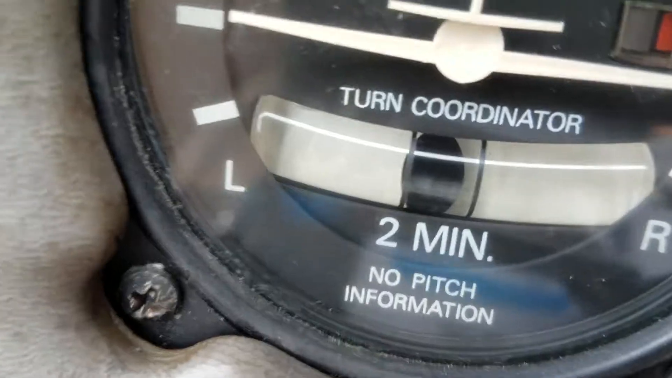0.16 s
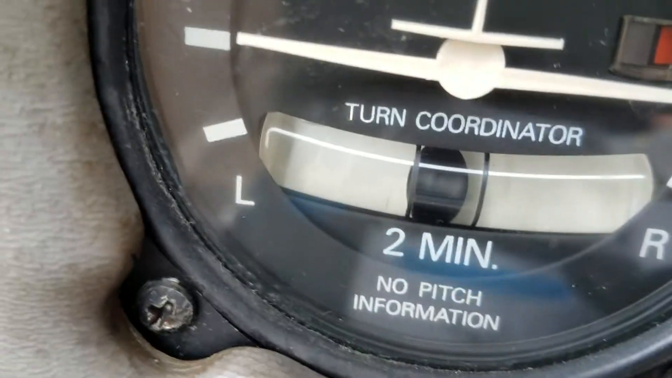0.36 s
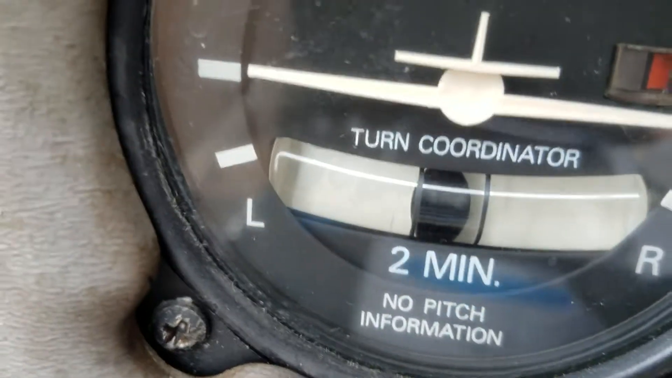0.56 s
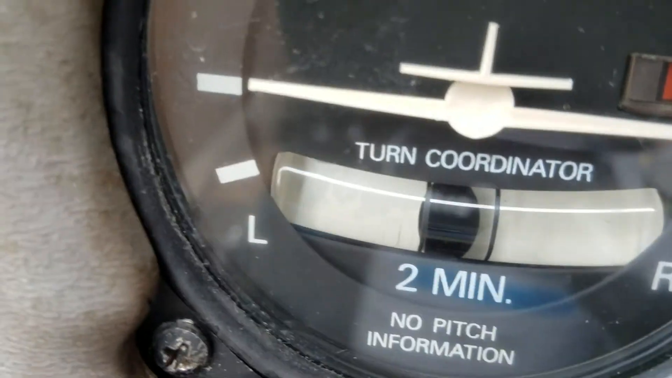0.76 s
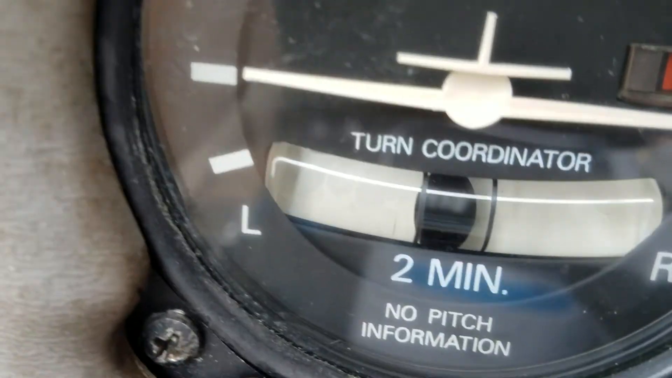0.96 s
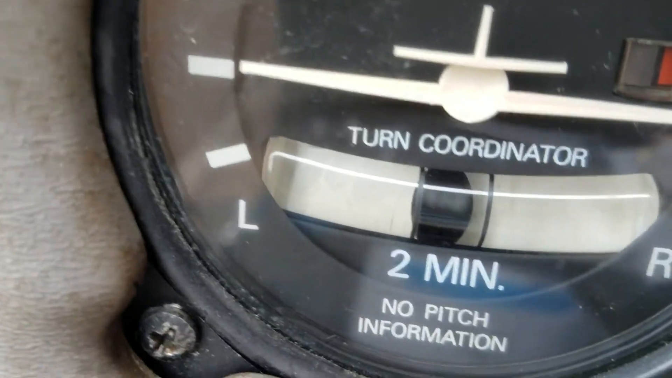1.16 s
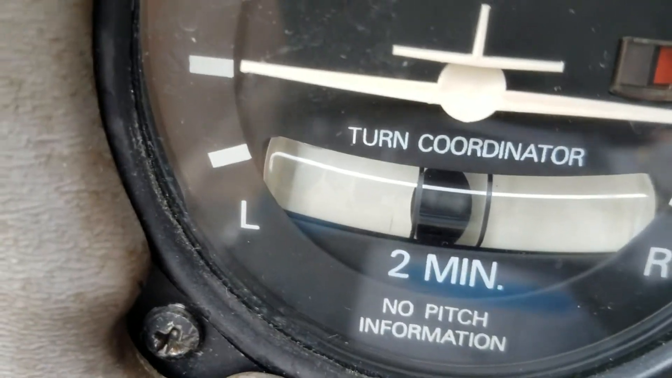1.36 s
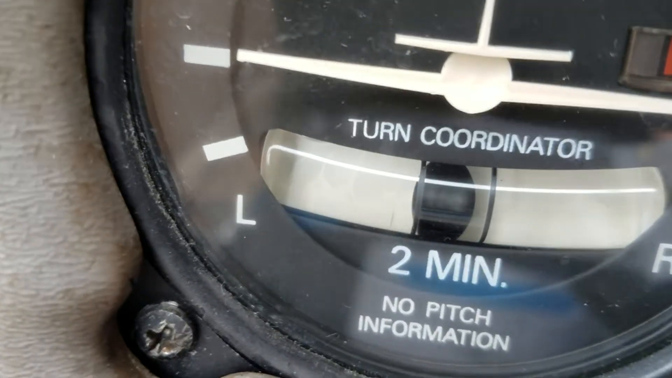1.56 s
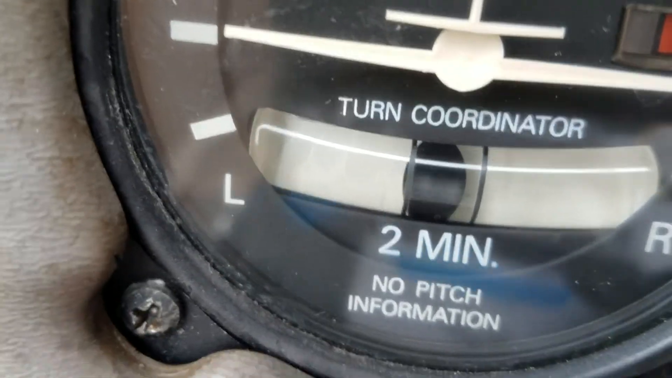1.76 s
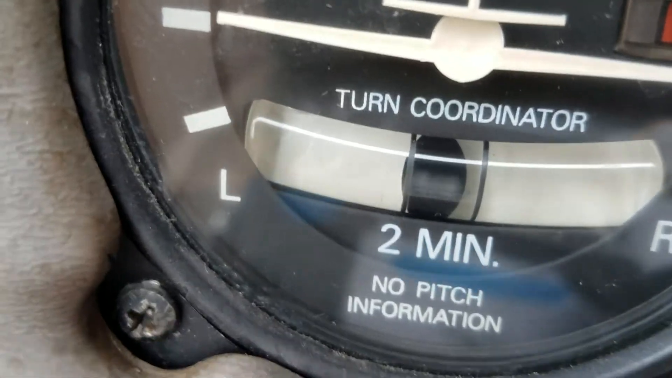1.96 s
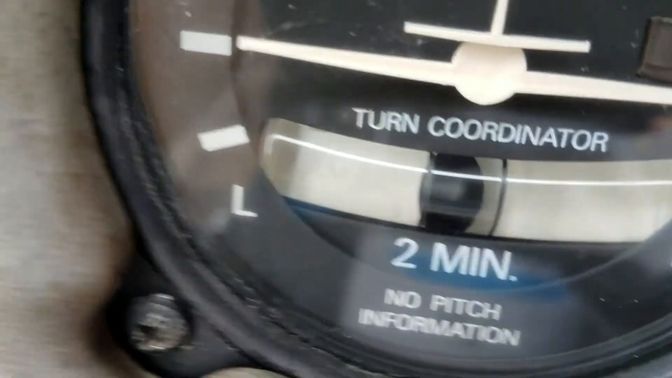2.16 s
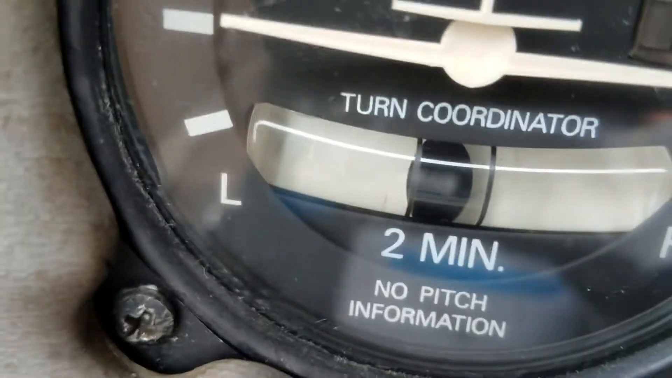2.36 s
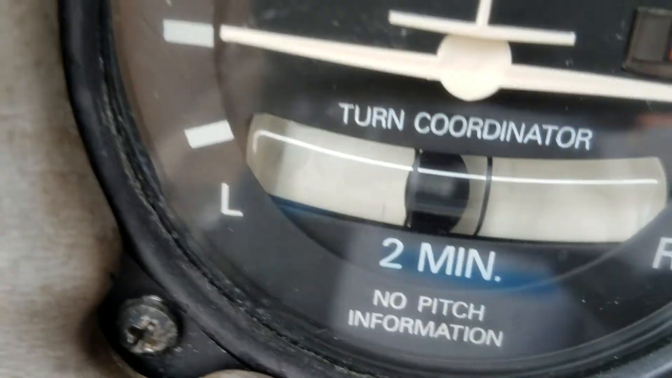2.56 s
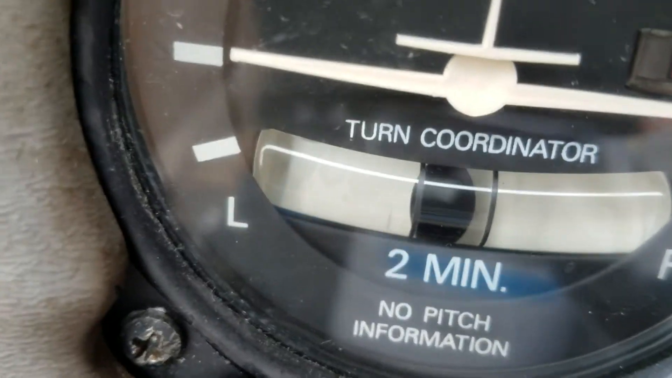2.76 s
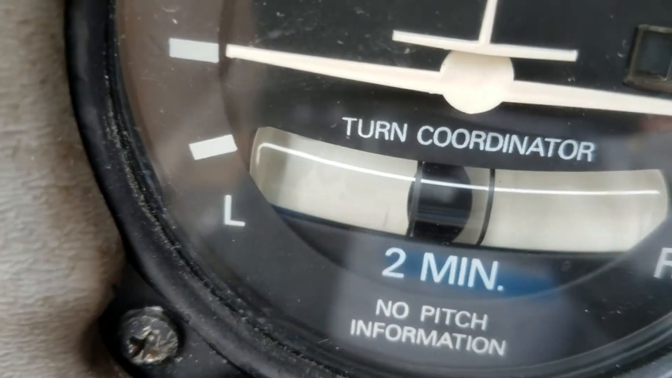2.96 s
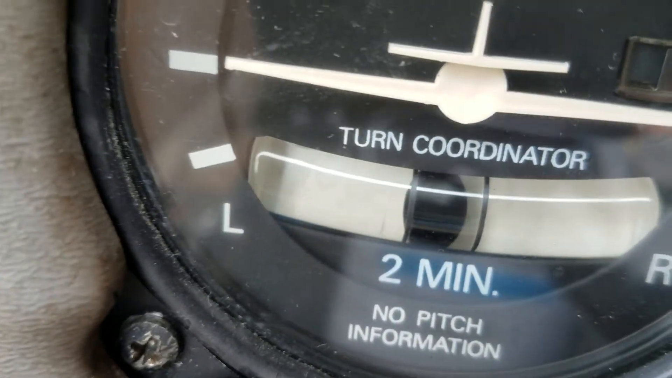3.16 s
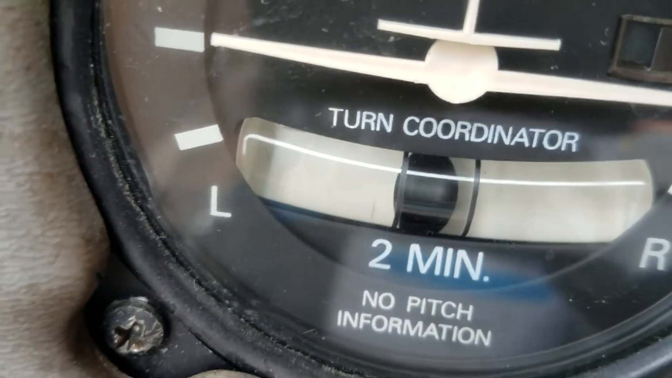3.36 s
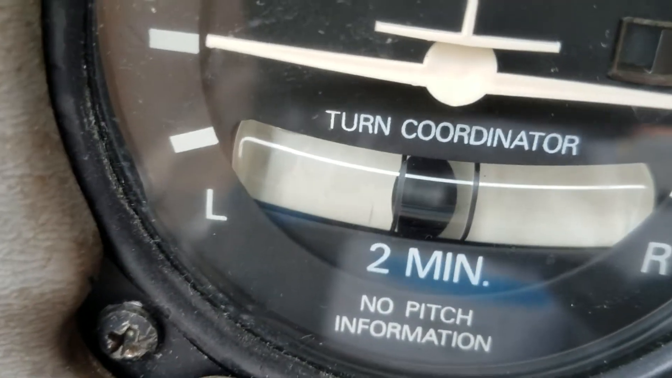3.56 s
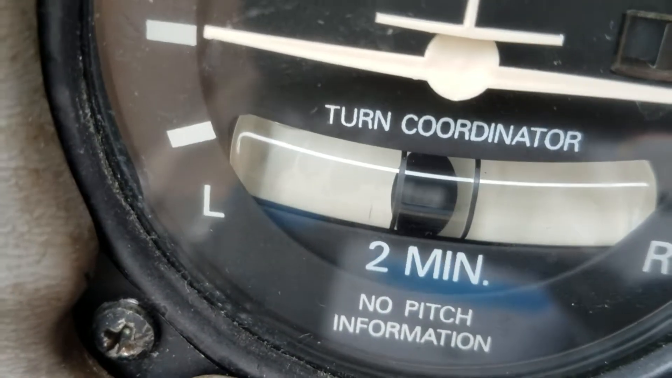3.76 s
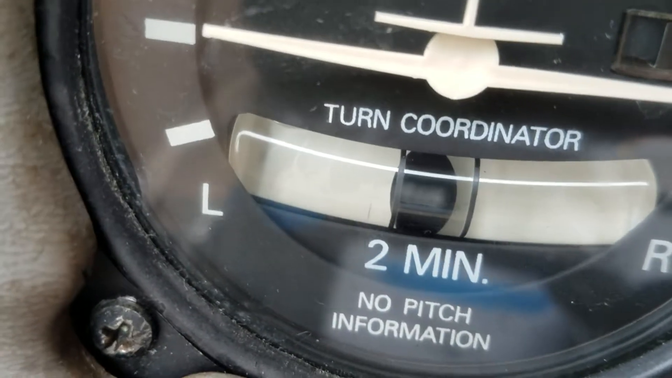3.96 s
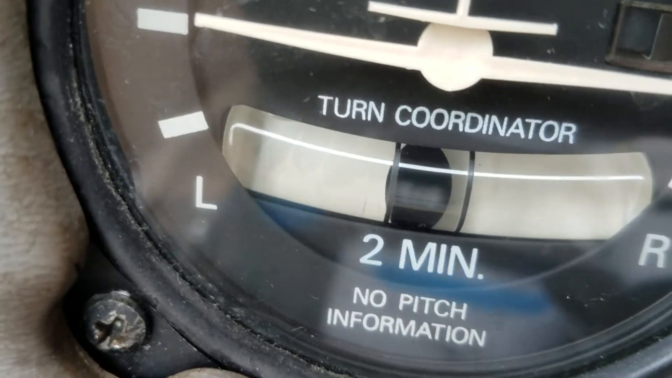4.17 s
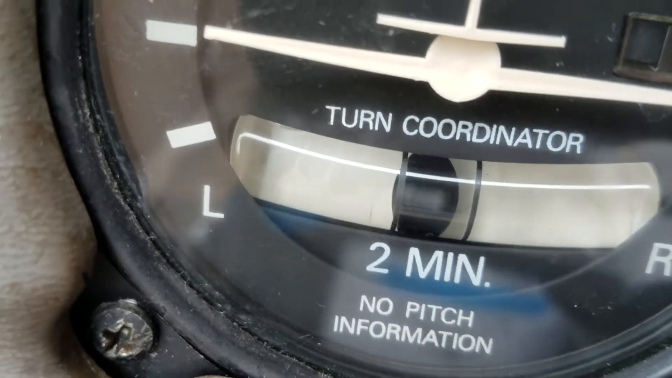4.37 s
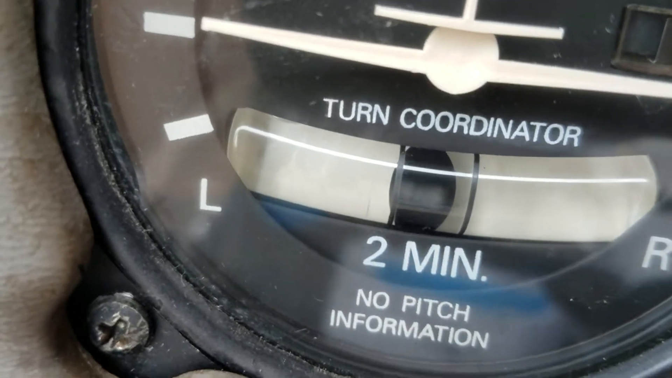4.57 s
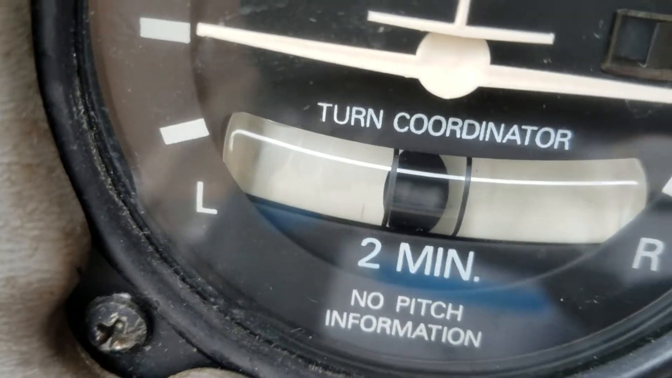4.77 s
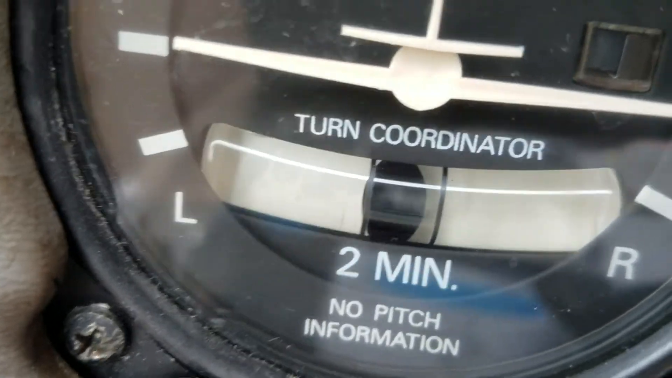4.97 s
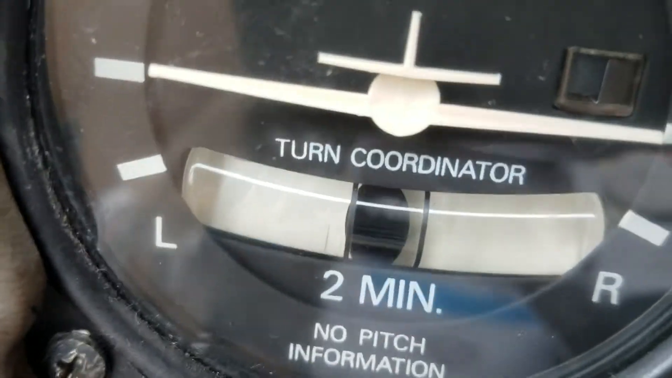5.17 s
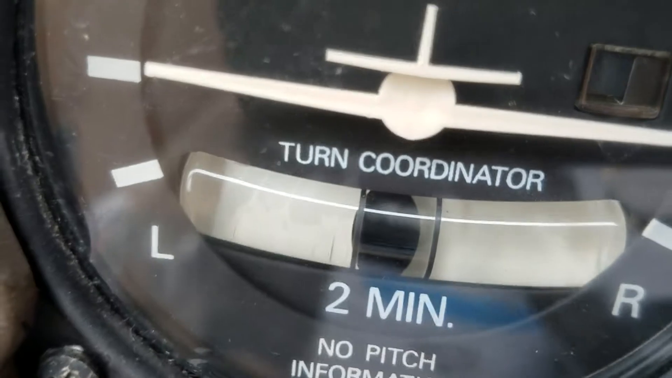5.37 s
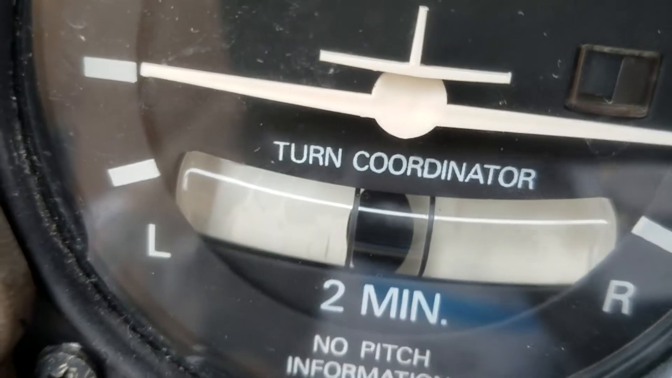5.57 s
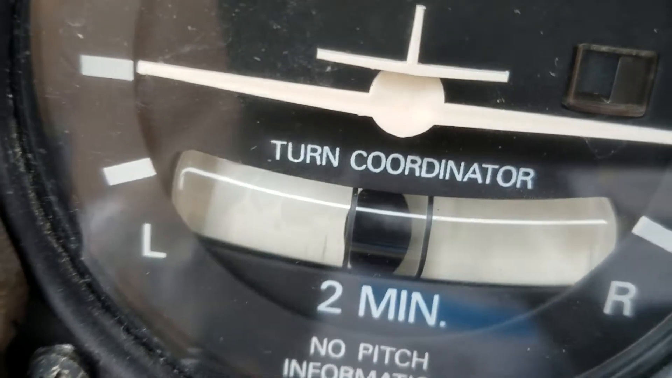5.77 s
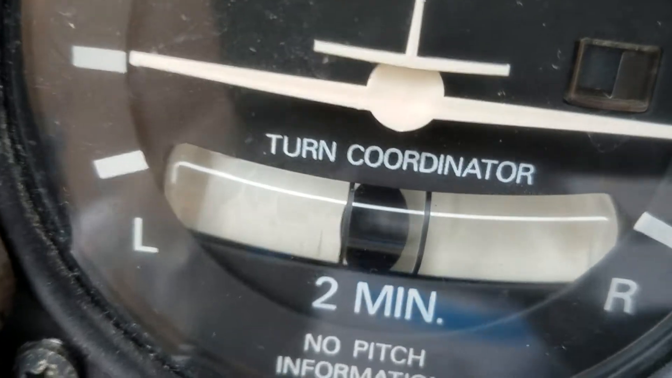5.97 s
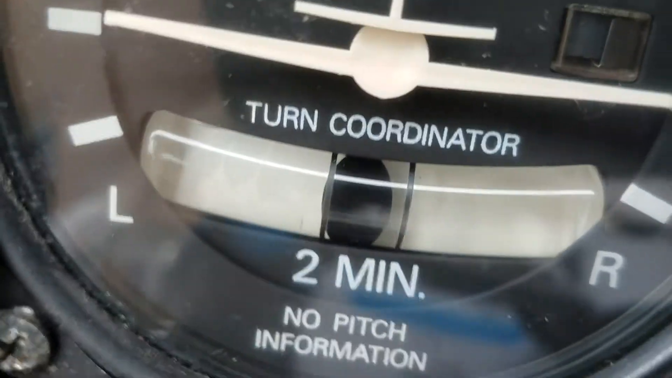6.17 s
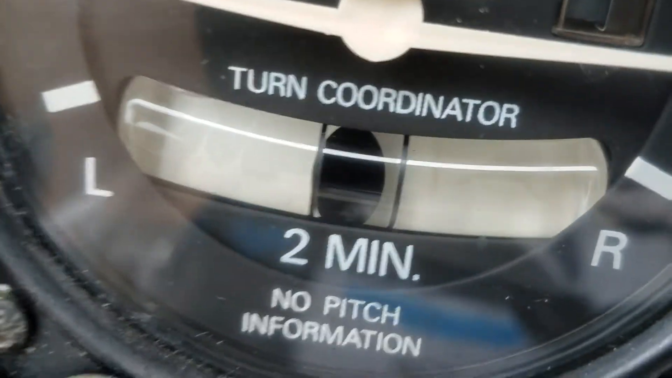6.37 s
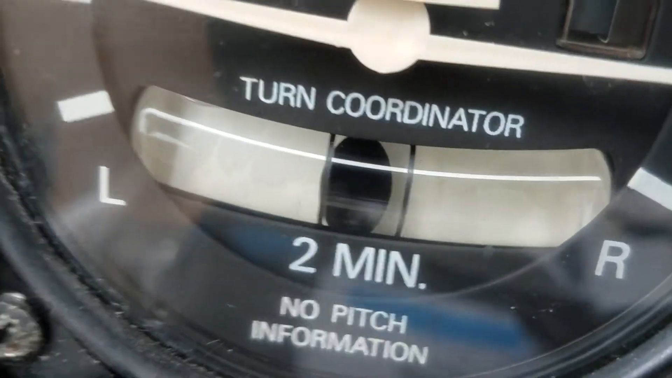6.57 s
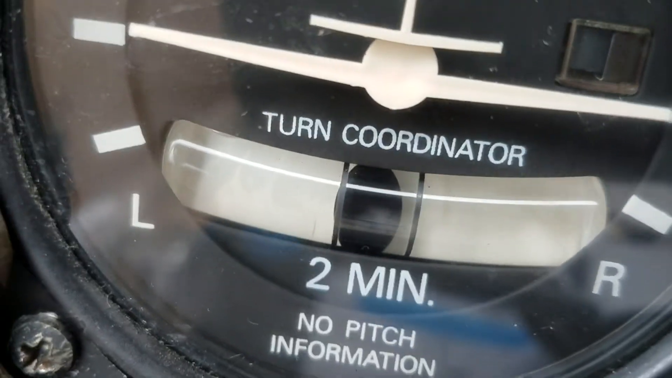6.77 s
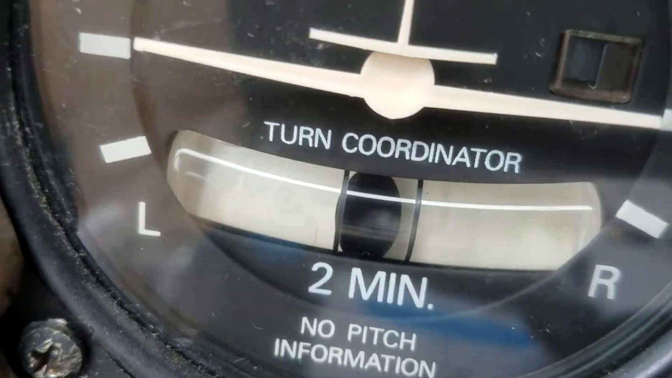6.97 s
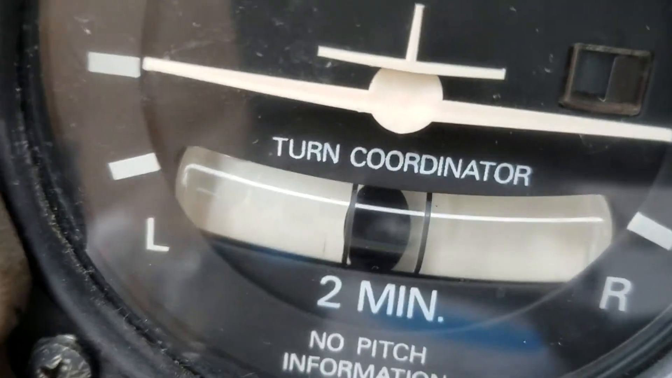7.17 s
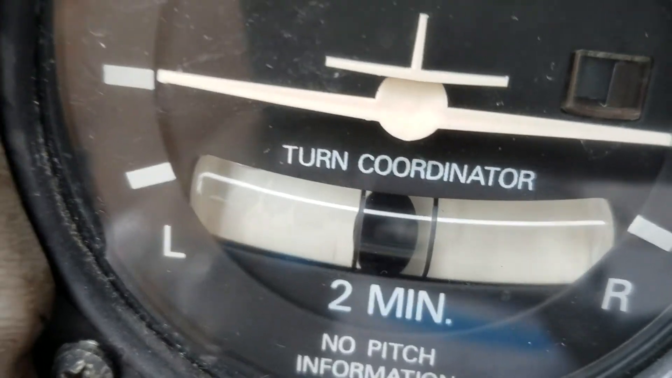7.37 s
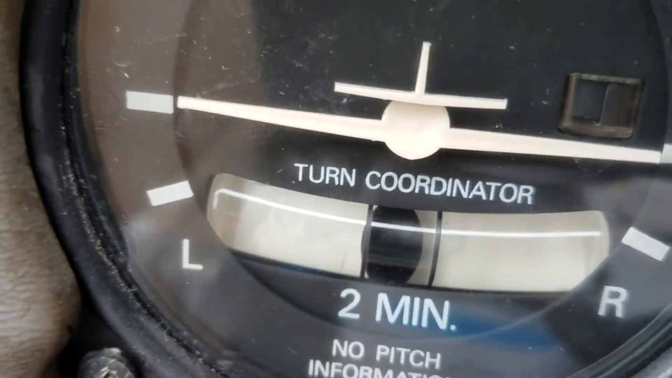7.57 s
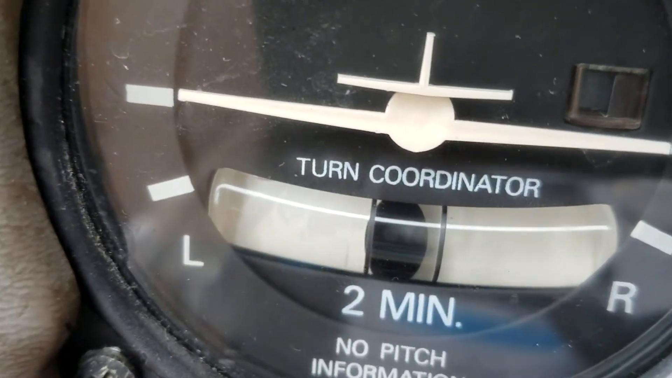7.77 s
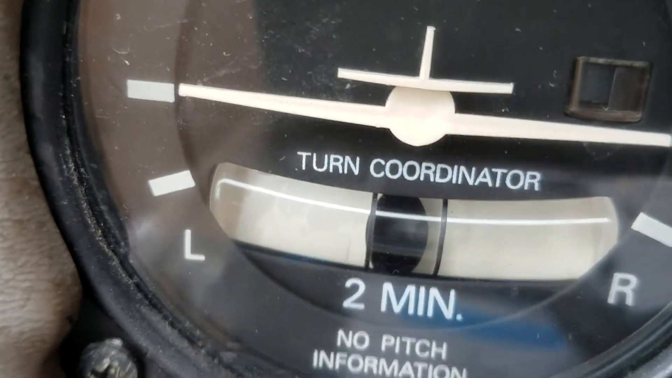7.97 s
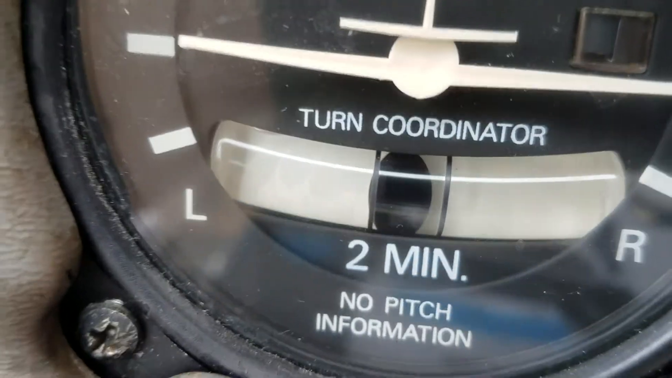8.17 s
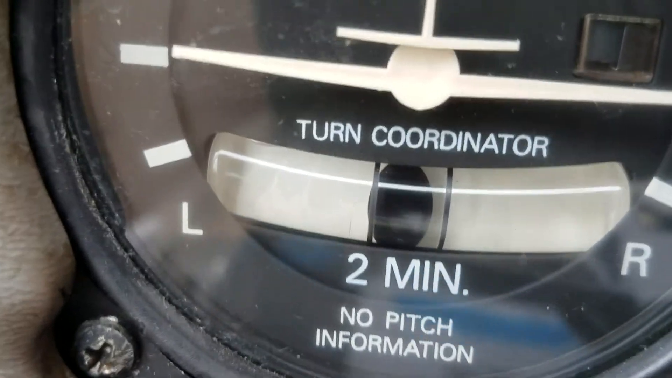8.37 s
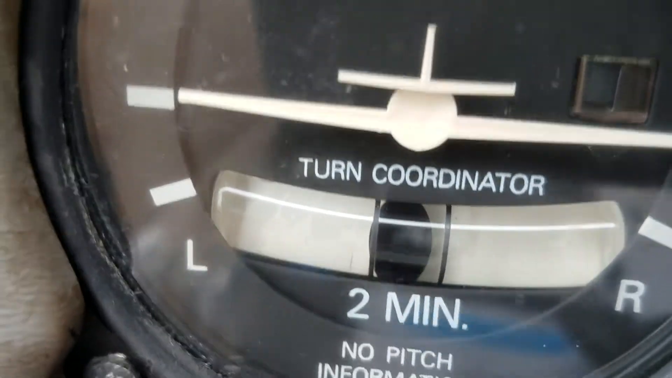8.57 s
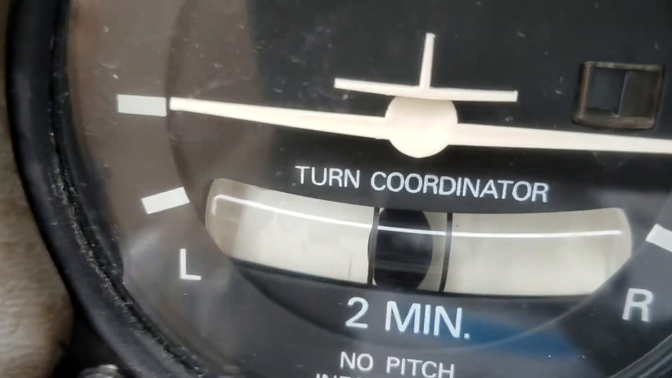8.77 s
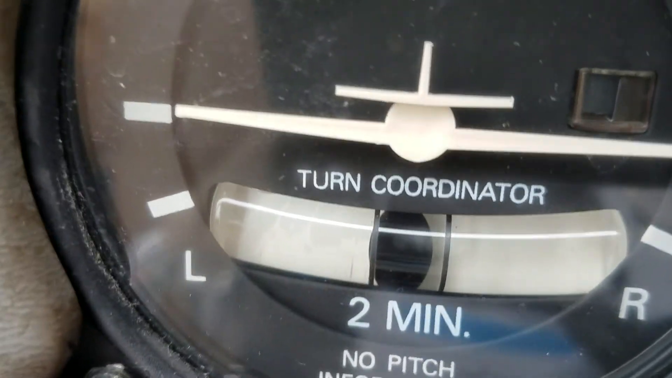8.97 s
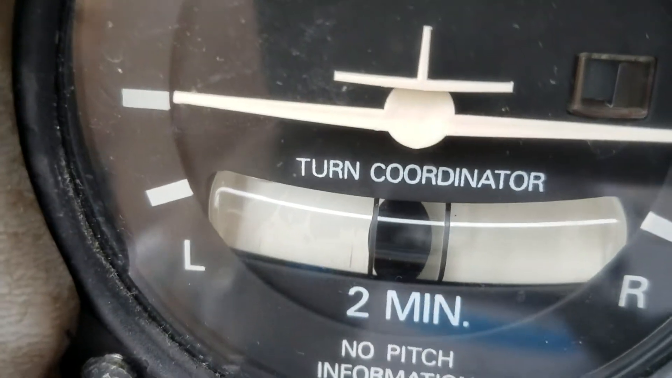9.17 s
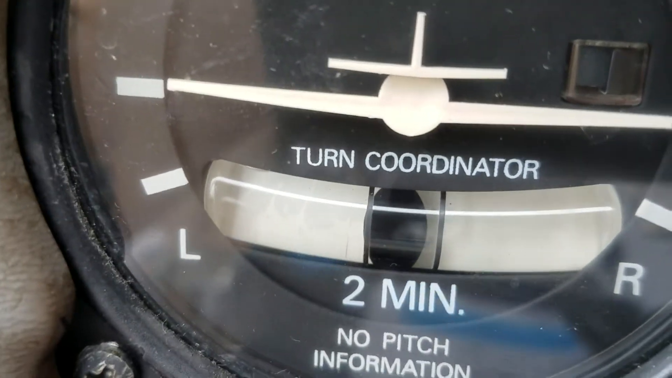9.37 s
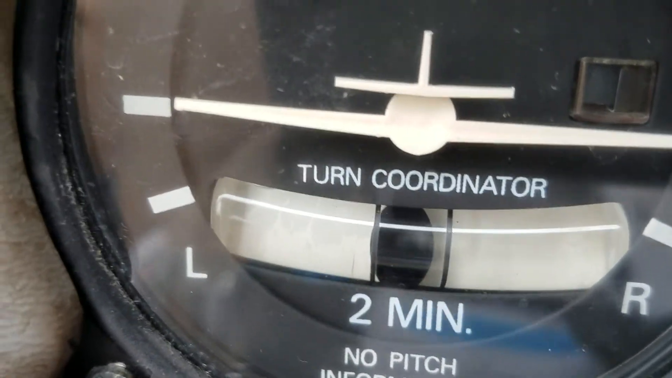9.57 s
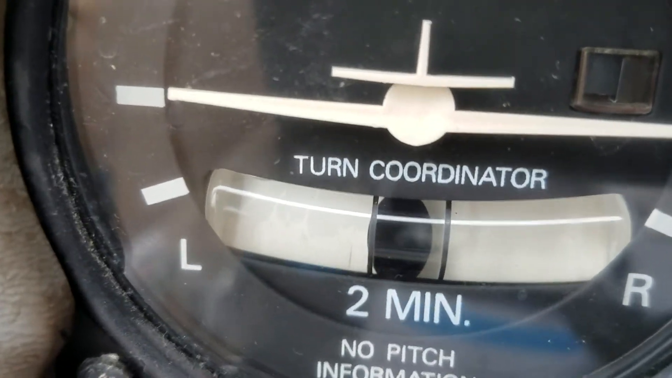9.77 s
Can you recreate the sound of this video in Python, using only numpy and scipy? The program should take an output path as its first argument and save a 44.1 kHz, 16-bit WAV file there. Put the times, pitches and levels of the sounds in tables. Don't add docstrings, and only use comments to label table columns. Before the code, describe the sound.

Very close in a quiet room, fingers thump the microphone ports of a hand-held device, with a short buzz and small scrapes. A hard double-click switch snaps, light knocks and a cloth brush follow, and a small gyro starts, its hissing bearings swelling into a cluster of metallic tones that climb quickly, then ever more slowly.

```python
import sys
import numpy as np
from scipy import signal
from scipy.fft import rfft, irfft, next_fast_len
from scipy.io import wavfile
from scipy.ndimage import map_coordinates

SR = 44100
rng = np.random.default_rng(int(sys.argv[2]) if len(sys.argv) > 2 else 0)


def waveform_to_disk(signal):
    frames = np.transpose(np.atleast_2d(signal))
    scaled = np.clip(frames, -1, 1) * 32767
    samples = np.round(scaled).astype(np.int16)
    wavfile.write(sys.argv[1], SR, samples)


def gain_from_db(level_db):
    decades = np.asarray(level_db, float) / 20
    return 10 ** decades


N = 433944
T = np.arange(N) / SR

START = 1.35
OUTER, INNER, SPIN = 3.305, 3.321, 2.678

# frequency in Hz, level in dB.
ROOM_AIR = [(180, -46), (300, -2.5), (737, -5.5), (900, -5.5), (3130, -13), (4990, -19), (8220, -11),
            (10400, -25), (12900, -17), (16000, -12.5)]
# frequency in Hz, level in dB.
RUMBLE_COLOUR = [(15, -14), (35, -4), (70, 4.5), (130, -1.5), (250, -7), (450, -23), (900, -31)]
# time in seconds, level in dB.
GRIP = [(0, -84), (.3, -64), (.6, -62), (.66, -83), (.85, -65), (.93, -75), (1.33, -72), (1.39, -56),
        (1.55, -73), (2.03, -69), (2.2, -72), (3.0, -78)]
# time in seconds, level in dB.
HAND_BUZZ = [
    (.69, -100),
    (.71, -64),
    (.86, -62.5),
    (.94, -110),
]
# start in seconds, peak in dB, left-right in dB, decay in 1/s, swing in Hz.
PORT_POPS = [
    (.011, -46, -5, 600, 100),
    (.0610, -5, 65, 600, 110),
    (0.198, -24.5, -33, 630, 90),
    (0.278, -44, 14, 460, 100),
    (0.6832, 1, -65, 770, 75),
    (0.783, -42, -19, 160, 79),
]
# start in seconds, peak in dB, ring in Hz, click in dB, left-right in dB.
HAND_KNOCKS = [(1.1833, -15.5, 800, 6, -13.5), (1.186, -26, 480, -30, -13), (1.385, -36, 200, -30, 0),
               (1.4155, -39, 700, -20, 0), (1.6364, -24.5, 786, -2.5, -13), (1.7815, -28, 900, 3, 8),
               (2.008, -25.5, 450, -5, -12), (2.046, -34, 300, -20, -2), (2.4059, -23, 665, 6, -8),
               (4.796, -25.5, 300, -30, -12), (4.8, -31, 130, -30, -5), (6.302, -34, 200, -30, 0),
               (6.7, -35, 160, -30, 0), (7.877, -21, 375, -30, -14)]
# start in seconds, peak in dB, decay by 60 dB in seconds,
# low part in dB, left-right in dB.
SWITCH_HITS = [(.799, -56, 0.018, -5, -10), (0.8745, -52, 0.016, -7, -15), (.882, -58, 0.018, -3, -9),
               (1.059, -60.5, 0.093, 2, -11), (1.124, -56, 0.055, 5, -10), (1.2314, -39, 0.07, -10, -25),
               (1.239, -33.5, 0.032, -12.5, 4), (1.3477, -4.5, 0.026, -9.5, -31.5),
               (1.351, -4.5, 0.024, -9.5, 11.5), (1.3633, -21, 0.021, -18, -4),
               (1.725, -51, 0.057, -11, -11), (1.784, -41.5, 0.028, 4.5, -17)]
# frequency in Hz, width in Hz, level in dB.
SWITCH_SPRING = [(8550, 680, 2), (9320, 250, 6.5), (10700, 1800, -12), (13300, 1100, -9.5),
                 (15600, 1100, -7)]
# frequency in Hz, width in Hz, level in dB.
SWITCH_HOUSING = [(200, 150, -21.5), (450, 330, -13), (970, 530, -5.5), (1850, 850, -4.5), (3160, 850, -5),
                  (5500, 3100, -19.5)]
# frequency in Hz, decay by 60 dB in seconds.
ROOM_DECAY = [(200, 1), (1000, 0.2), (4000, 0.22), (12000, 0.21)]
# delay in seconds, left gain, right gain (linear).
NEAR_ECHOES = [(.0029, 0.24, -0.15), (.0047, -0.4, 0.13)]
# time in seconds, shaft speed in dB, twice shaft speed in dB.
ROTOR_HUM = [(2.5, -53, -71), (4, -76, -61), (5.5, -60.5, -56.5), (7, -56.5, -63.5), (8, -52.5, -65),
             (9, -48, -59), (9.84, -40.5, -53)]
# frequency in Hz, width in Hz, level in dB,
# left-right in dB, left lead in radians.
CASE = [(270, 380, -34.5, 12, -0.3), (503.6, 18, -27.5, 20.5, -1), (662, 120, -26.5, 23.5, 3.5),
        (648.4, 86, -14.5, 6, 0.17), (775.3, 18, -17, -20.5, 3.5), (902, 150, -18, -4.5, 1.17),
        (1336, 102, -9.5, -11, 0.48), (1563, 130, -18.5, -3, 2), (1940, 550, -21, -18, 5),
        (2218, 188, -3.5, 1.5, -1.76), (2870, 420, -11.5, -4.5, 1.4), (3740, 970, -23, 6, 2),
        (3940, 1660, -19.5, 1.5, -4), (4269, 268, -6.5, -5, 1.46), (4954, 220, -24, 18.5, 4),
          (4730, 580, -27, 13.5, 4), (5420, 290, -28, 21, -0.5), (5940, 220, -18, -4.5, 0.9),
          (6030, 820, -40, -13, 1.5),
        (7620, 950, -16.5, 1, -3.3), (8122, 540, -6, -13.5, -4), (8314, 270, -7, -15.5, 2.7),
         (8310, 1120, -8.5, -6.5, 3), (10400, 380, -41, 2, 6.5), (9915, 650, -8, -2, -2),
         (9740, 590, -15.5, -0.5, 6), (12270, 400, -18.5, -0.5, -5.5), (13700, 920, -25.5, 5.5, -2),
         (13700, 330, -31, 2, -6.5),
        (3475, 61, -15, -1, 1.6)]
# slow level in dB, fast level in dB,
# sideband below in dB, sideband above in dB.
OUTER_DB = [(-48, -29.5, 12.5, -5), (-29.5, -21, 0, 0), (-29.5, -14.5, -8, -16), (-27.5, -19.5, -4.5, -7),
            (-25, -16.5, -6, -1.5), (-25, -23, 5.5, -5), (-35, -30, 6.5, -11), (-28, -29, 6, -4),
            (-32, -29.5, 8, -19)]
# slow level in dB, fast level in dB,
# sideband below in dB, sideband above in dB.
INNER_DB = [(-25, -15.5, -7, -4), (-22.5, -31, -3, 2.5), (-30, -15.5, -22, -25), (-26.5, -25, -8, -49),
            (-22.5, -23, -4, 2), (-26.5, -34.5, -25, 10), (-30, -37, -5, 8)]
# slow level in dB, fast level in dB,
# sideband below in dB, sideband above in dB.
SPIN_DB = [(-25, -28, -7, -18), (-31, -26, -0.5, -17), (-31.5, -16.5, -18, -6), (-27, -18, -22.5, -14),
           (-28.5, -26, -24, -27), (-45, -23, -25, -19), (-19.5, -19.5, -18, -9), (-26.5, -16.5, -0.5, -9)]
# slow level in dB, fast level in dB.
HALVES_DB = [(-31, -12.5), (-27, -16), (-17.5, -11.5), (-25, -23), (-23, -22)]
FAR_SIDES = [INNER + 1, OUTER + 1.5, INNER + 2, 2 * INNER - 1, 2 * OUTER + 1, 2 * INNER + 1.5, 2 * OUTER +
             2, 3 * OUTER - 1, 2 * INNER + 2.5, 3 * OUTER + 1, 3 * OUTER + 3.5, INNER - 1, 7 * INNER + 1.05]
# slow level in dB, fast level in dB.
FAR_DB = [(-28, -22), (-36, -26), (-25.5, -26.5), (-37, -28), (-29.5, -14.5), (-26, -21), (-31, -19.5),
          (-45, -24), (-38, -22.5), (-30, -29), (-25, -18), (-29, -22), (-24, -25)]
# time in seconds, left-right in dB.
PHONE_DRIFT = [(1.46, -6), (1.8, 1), (2.4, 3), (3.2, 3), (4.1, -1), (4.9, -1), (5.7, -1.5), (6.15, 3),
               (6.6, 2), (7.2, -2.5), (7.7, -3), (8.3, -2), (8.8, -2.5), (9.2, -2), (9.6, -1), (9.84, -3)]
# frequency in Hz, width in Hz, depth from 0 to 1.
SHADING = [(2530, 210, .85), (3870, 190, .85), (6750, 450, .6),
           (11300, 750, 1), (13100, 340, 0.6)]


def unit(x):
    return x / np.sqrt(np.mean(x ** 2) + 1e-20)


def along(points, hz):
    f, v = np.transpose(points)
    return np.interp(np.log(hz + 1), np.log(f + 1), v)


def curves(rows):
    s, *cols = np.transpose(rows)
    return [np.interp(T, s, c) for c in cols]


def wobble(rate, size=1):
    knots = rng.standard_normal(int(N * rate / SR) + 4)
    return map_coordinates(knots, [T[::size] * rate], order=1)


def filtered(x, response):
    m = next_fast_len(x.shape[-1] + 8192)
    spectrum = rfft(x, m) * response(np.fft.rfftfreq(m, 1 / SR))
    return irfft(spectrum, m)[..., :x.shape[-1]]


def peak(f, hz, width):
    return 1j * f * width / (hz * hz - f * f + 1j * f * width)


def add(out, s, sound, pan_db):
    gains = gain_from_db(np.array([np.minimum(pan_db, 0), np.minimum(-pan_db, 0)]))
    out[:, round(s * SR):][:, :len(sound)] += gains[:, None] * sound


def port_noise(alike):
    return alike * rng.standard_normal(N) + rng.standard_normal((2, N))


def room_air():
    colour = unit(filtered(port_noise(0.1), lambda f: gain_from_db(along(ROOM_AIR, f))))
    return gain_from_db(-63.5 + wobble(42) - 19 * np.exp(-T / 0.32)) * colour


def hand_rumble():
    shake_s, rise_s = 3.06, 0.6
    shake = gain_from_db(-56.5 + 0.3 * (T - shake_s) + 1.4 * wobble(2.14))
    shake = shake * np.clip((T - shake_s) / rise_s, 0, 1)
    grip_db, = curves(GRIP)
    grip_db = grip_db * (1 + (T > GRIP[-1][0]))
    lumps = gain_from_db(2.5 * wobble(14))
    rumble = lumps * filtered(port_noise(1.0), lambda f: gain_from_db(along(RUMBLE_COLOUR, f)))
    return np.hypot(gain_from_db(grip_db + 4.0), shake) * unit(rumble)


def cloth_brush():
    loudest_s, lift_off_s = 2.246, 2.43
    swish = filtered(port_noise(.3), lambda f: peak(f, 12000, 9000) * (f < 16000))
    stroke = gain_from_db(-47 - 136 * (T - loudest_s) ** 2 + 2.1 * wobble(31))
    return np.clip((lift_off_s - T) / 0.04, 0, 1) * stroke * unit(swish)


def hand_buzz():
    tone = 0.87 * np.sin(2 * np.pi * 190 * T) + np.sin(2 * np.pi * 380 * T)
    return gain_from_db(curves(HAND_BUZZ)[0]) * tone * gain_from_db([[-3], [0]])


def port_pops():
    out, t = np.zeros((2, N)), T[:2000]
    for s, db, pan_db, decay, hz in PORT_POPS:
        w = 2 * np.pi * hz
        swing = np.cos(w * t) - decay / w * np.sin(w * t)
        step = np.exp(-decay * t) * swing * (1 - np.exp(-t / .00005))
        add(out, s, gain_from_db(db) * step, pan_db)
    return out


def hand_knocks():
    out, t = np.zeros((2, N)), T[:1500]
    for s, db, hz, click_db, pan_db in HAND_KNOCKS:
        ring = -np.cos(2 * np.pi * hz * t) * np.exp(-1.1 * hz * t) * (1 - np.exp(-12 * hz * t))
        click = gain_from_db(click_db) * np.sin(-2 * np.pi * 4000 * t) * np.exp(-t / .00008) * 2
        add(out, s, gain_from_db(db - 1) * (ring + click), pan_db)
    return out


def switch_hits():
    out, t = np.zeros((2, N)), T[:8000]

    def body(modes):
        return lambda f: sum((-1) ** k * gain_from_db(db) * peak(f, hz, w) for k, (hz, w, db) in enumerate(modes))

    for s, db, t60, low_db, pan_db in SWITCH_HITS:
        envelope = gain_from_db(-60 * t / t60) * (1 - np.exp(-t / 0.00028))
        burst = rng.standard_normal((2, len(t))) * envelope
        spring = filtered(burst[0], body(SWITCH_SPRING))
        housing = filtered(burst[1], body(SWITCH_HOUSING))
        add(out, s, gain_from_db(db + 8.0) * (spring + gain_from_db(low_db + 8.5) * housing), pan_db)
    return out


def room(x):
    hz, t, z = signal.stft(rng.standard_normal((2, SR // 2)), SR, nperseg=256)
    decay = gain_from_db(-60 * t / along(ROOM_DECAY, hz)[:, None])
    tail = signal.istft(z * decay, SR, nperseg=256)[1]
    return signal.fftconvolve(x, tail / np.linalg.norm(tail[0]), axes=1)[:, :N]


def near_echoes(x):
    out = x.copy()
    for delay, *gains in NEAR_ECHOES:
        for side, gain in enumerate(gains):
            drift = 2.5 * map_coordinates(rng.standard_normal(12), [T * .6])
            late = np.arange(N) - delay * SR - drift
            out[side] += gain * map_coordinates(x[side], [late], order=1)
    return out / np.sqrt(1.15)


def case_shading(x):
    dips = SHADING

    def response(f):
        return np.prod([1 - np.clip(depth, 0, 1) * abs(peak(f, hz, w)) ** 2 for hz, w, depth in dips], axis=0)

    return filtered(x, response)


def rotor_speed():
    top_speed, rise_s = 284.1, 8.56
    lag = .05 * np.exp((START - T) / 1.35)
    return top_speed * (1 - np.exp(-np.maximum(T - START, 0) / rise_s)) * (1 - lag)


def rotor_hum(turn):
    shaft_db, twice_db = curves(ROTOR_HUM)
    shaft = gain_from_db(shaft_db + wobble(2.26)) * np.sin(turn)
    twice = gain_from_db(twice_db + wobble(1.3)) * np.sin(2 * turn)
    return np.sqrt(2) * (shaft + twice) * gain_from_db([[2.5], [-2.5]])


def bearing_tones(turn, fast):
    slip = .004 * np.clip(fast - .5, 0, 1) * 2
    spin = np.cumsum(np.gradient(turn) * SPIN * (1 - slip))
    # (slow dB, fast dB)
    lines = [(k, 0, db) for k, db in zip(FAR_SIDES, FAR_DB)]
    lines += [(k + 1.5, 0, db) for k, db in enumerate(HALVES_DB)]
    families = [(OUTER, 0, .5, OUTER_DB), (INNER, 0, .5, INNER_DB), (0, 1, 1, SPIN_DB)]
    for ratio, spins, side, rows in families:
        for k, (slow_db, fast_db, *sides_db) in enumerate(rows, 1):
            for way, db in zip((0, -1, 1), (0, *sides_db)):
                lines.append((k * ratio + way * side, k * spins, (slow_db + db, fast_db + db)))
    out, few = 0, fast[::64]
    for k, spins, (slow_db, fast_db) in lines:
        level_db = slow_db + few * (fast_db - slow_db) + 5 - 6 * few
        tilt_db = (.57 * few - .42) * (k + spins * SPIN)
        gain = gain_from_db(level_db + tilt_db + 2.5 * wobble(6, size=64))
        phase = k * turn + spins * spin + 2 * np.pi * rng.random()
        out = out + np.interp(T, T[::64], gain) * np.sin(phase)
    return out


def case_response(modes):
    def response(f):
        total = 0
        for hz, w, db, pan, lead in modes:
            ports = gain_from_db(db + np.array([[pan], [-pan]]) / 2) * np.exp(.5j * np.array([[lead], [-lead]]))
            ring = peak(f, hz, w)
            total = total + ports * ring * abs(ring) ** .3
        return total
    return response


def ringing_case(speed, turn, seated):
    fast = np.clip((speed - 100) / 50, 0, 1)
    tones = gain_from_db(3 * (1 - fast)) * bearing_tones(turn, fast)
    once_a_turn = 1 + .3 * np.sin(turn)
    ball_pass = 1 + .3 * np.sin(OUTER * turn)
    chatter = gain_from_db(0.37 * wobble(40) + 0.077 * wobble(4.8) + 0.86 * (1 - seated) * wobble(25.3))
    modes = CASE
    sound = 0
    for first, beat in enumerate([once_a_turn, ball_pass]):
        shared, own = rng.standard_normal(N), rng.standard_normal((2, N))
        drive = chatter * beat * (shared + 0.19 * own) + seated * tones
        sound = sound + filtered(drive, case_response(modes[first::2]))
    return sound


def above(f, edge):
    return np.clip((f - edge) / 500 + .5, 0, 1)


def tipped(whine):
    tip = 1 / (1 + ((T - 6.42) / 0.61) ** 4)
    upper = filtered(whine, lambda f: above(f, 4650))
    return gain_from_db(-2 * tip) * (whine - upper) + gain_from_db(5 * tip) * upper


def gyro():
    speed = rotor_speed()
    turn = 2 * np.pi * np.cumsum(speed) / SR
    seated = np.clip((speed - 36) / 42.5, 0, 1)
    sound = ringing_case(speed, turn, seated)
    edges = [-SR, 1700, 3300, 7000, 9200, SR]
    bands = [filtered(sound, lambda f: above(f, lo) - above(f, hi)) for lo, hi in zip(edges, edges[1:])]
    low, middle, whine, hiss, top = bands
    whine = tipped(whine)
    pan_db, = curves(PHONE_DRIFT)

    def waking(full_db, knee, climb, leans):
        creep = 2.7
        short_db = np.log10(1 + (knee / (speed + creep)) ** climb)
        return gain_from_db(full_db - short_db + leans * (pan_db - pan_db.mean()))

    def size(x):
        return np.std(x.mean(0)[N // 2:])

    loose_db = 8.5 * np.exp(START - T)
    body = (gain_from_db(loose_db) * low + gain_from_db(-.8 * loose_db) * middle) / size(low + middle)
    out = waking(-36, 38, 31, 0.1) * body + waking(-37, 66.5, 39.5, -0.56) * whine / size(whine)
    treble = waking(-33, 132.5, 31.5, 0.16) * hiss / size(hiss) + waking(-35, 164, 38, 0.8) * top / size(top)
    out = out + gain_from_db(np.array([pan_db, -pan_db]) / 2) * treble
    fade_in = np.clip((T - 1.4) / 0.21, 0, 1)
    return fade_in * (out + seated * rotor_hum(turn))


def scene():
    background = room_air() + hand_rumble() + cloth_brush() + hand_buzz()
    clicks, taps = switch_hits(), hand_knocks()
    hits = port_pops() + clicks + taps + room(gain_from_db(-6.5) * clicks + gain_from_db(-40) * taps)
    return background + hits + case_shading(near_echoes(gyro()))


def low_pass(x):
    return signal.sosfilt(signal.butter(12, 16300, fs=SR, output="sos"), x)


def record(dry):
    ceiling = .8
    rounded = dry / (1 + abs(dry / ceiling) ** 6) ** (1 / 6)
    heard = filtered(rounded, lambda f: 1 / (1 + (f / 15700) ** 60))
    return low_pass(heard)


dry = scene()
out = record(dry)
waveform_to_disk(out)
```